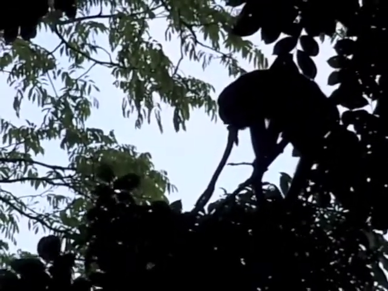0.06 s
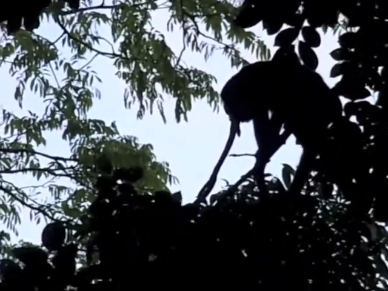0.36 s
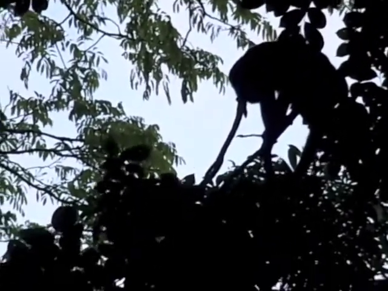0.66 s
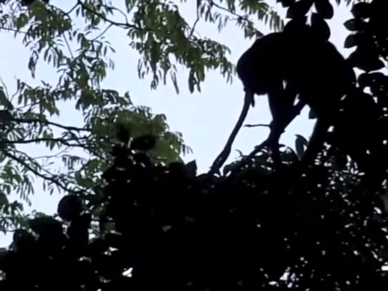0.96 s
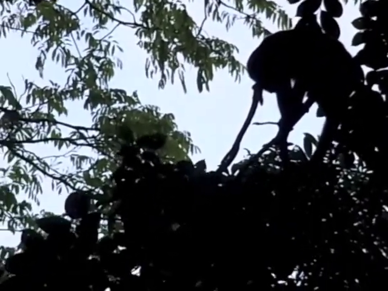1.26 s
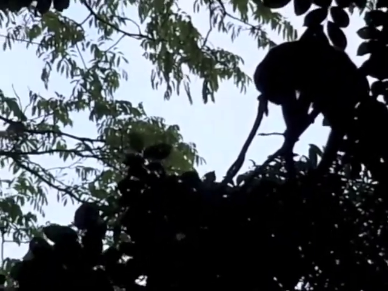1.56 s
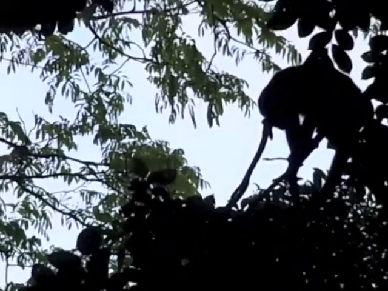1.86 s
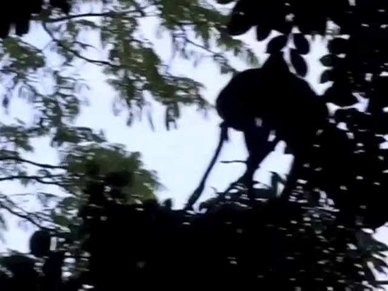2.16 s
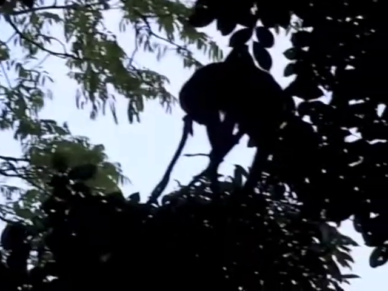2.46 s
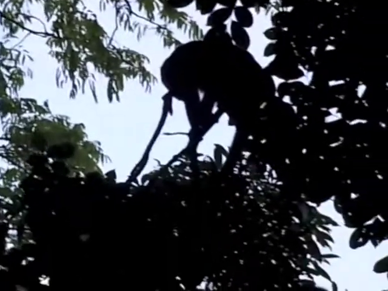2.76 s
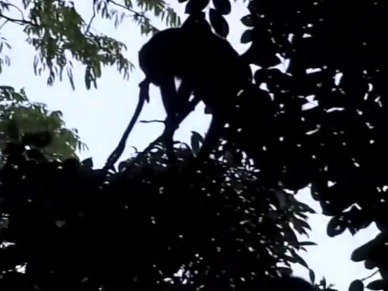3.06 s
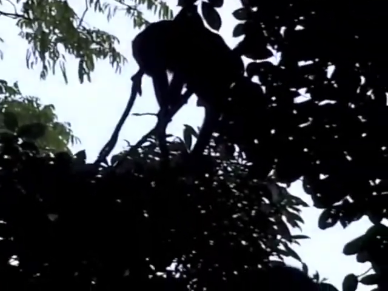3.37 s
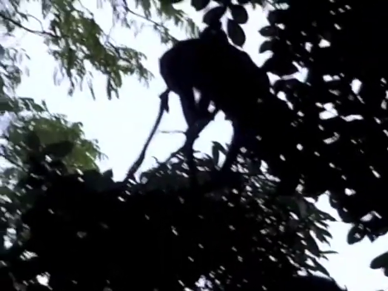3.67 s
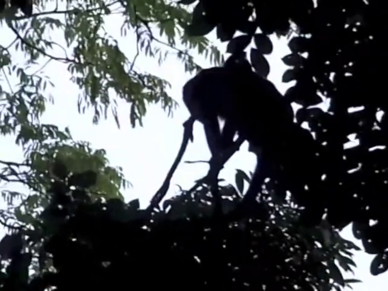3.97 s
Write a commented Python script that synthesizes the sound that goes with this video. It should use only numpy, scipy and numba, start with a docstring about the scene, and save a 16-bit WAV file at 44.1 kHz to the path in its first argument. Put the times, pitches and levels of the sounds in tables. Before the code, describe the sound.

Hoarse grunting barks from a monkey repeat steadily over a faint outdoor hush.

```python
"""In a forest, a howler monkey up in a treetop gives four hoarse barks, about two a second: irregular
flaps of its vocal folds and rushing air ring the throat sac and mouth, and the trees echo each bark.
It draws a rasping grunt inward just as a bird chirps once, far off. Four more barks and a second
inward grunt follow. Throughout, a distant hush and faint insects lie behind the monkey, and the
camera whines thinly at the microphone."""
import sys
import numpy as np
from scipy import signal
from scipy.fft import rfft, irfft
from scipy.io import wavfile
from numba import njit

SR = 44100
rng = np.random.default_rng(int(sys.argv[2]) if len(sys.argv) > 2 else 0)


def log_audio(samples):
    """Write samples as a 16-bit WAV file to the path given in sys.argv[1]."""
    # one column per channel
    frames = np.atleast_2d(samples).T
    # limit to full scale, then quantise
    limited = np.clip(frames, -1, 1)
    pcm = np.round(limited * 32767).astype(np.int16)
    wavfile.write(sys.argv[1], SR, pcm)


N = 176400

# The barks, levels relative: start_s, end_s, level_db, sac_db, mouth_db's tone mouth_hz, mouth_db,
# mouth_surge_s, nasal_db, rasp_ring_hz, rasp_db, rasp_surge_s, lower_ring_db
BARKS = [(0.000, 0.163, 0, 2, 656, -0.5, 0.075, 0.5, 3360, 3, 0.13, -2),
         (0.487, 0.64, -.5, 4, 660, -1, 0.11, -3, 3380, 0.5, 0.093, -1.5),
         (0.948, 1.114, -1, 2.5, 660, -1, 0.072, -0.5, 3273, 1.5, 0.099, -2),
         (1.527, 1.675, -4, 4, 665, 6, 0.086, 4, 3330, 4.5, 0.091, -4.5),
         (2.135, 2.262, -.5, 0.5, 732, 0.5, 0.14, 6.5, 3340, 2.5, .09, -1),
         (2.514, 2.663, 1.5, 2, 677, -2, 0.112, -10, 3192, -1, 0.058, 0),
         (2.994, 3.129, 1.5, 1, 689, -2, 0.099, -9, 3210, -1.5, 0.095, 4),
         (3.481, 3.627, -1, 1.5, 728, -0.5, 0.13, -7, 3186, 3, 0.22, 3)]
# Inward grunts: start_s, length_s, gain_db
INWARD_GRUNTS = [(1.852, 0.093, -6), (3.889, .125, -4.5)]
# Broad throat resonances of a bark: centre_hz, width_hz, gain_db
THROAT_MODES = [(276.8, 38, -14), (375, 59, -2), (501.4, 76, -4), (629, 57, -5.5), (733, 120, -10),
                (1010, 63, -23), (1214.5, 37, -11.5)]
# Upper resonances that the rasp excites: centre_hz, width_hz, gain_db
RASP_MODES = [(3240, 280, -16.5), (4838, 78, -19.5), (4960, 580, -13.5), (5950, 500, -31.5),
              (7060, 200, -23.5), (7540, 400, -23.5), (3700, 7900, -23.5)]
# Resonances of an inward grunt: centre_hz, width_hz, gain_db
GRUNT_MODES = [(326, 110, -4.5), (391, 105, 2.5), (502, 170, -10), (710, 46, 0), (1220, 710, -36),
               (2880, 90, -21), (6000, 360, -23), (4570, 1900, -28)]
# Echoes off nearby trunks: delay_s, gain_db
TRUNK_ECHOES = [(0.044, -24), (.11, -15), (0.158, -26.5)]
# Bands that linger among the trees: centre_hz, width_hz, gain_db, t60_s
LINGERING_BANDS = [(329, 34, -5.5, 1.14), (675, 82, -6, 1.01)]
# Steady shrills of far insects: pitch_hz, width_hz, level_db
INSECT_SHRILLS = [(4966, 210, -64), (6976, 450, -66)]
# Swells of high insect fizz: peak_s, half_length_s, level_db
FIZZ_SWELLS = [(0.038, 0.06, -61), (0.637, 0.12, -62), (1.34, .09, -61), (3.44, 0.12, -66)]
# Spectrum of the distant hush: frequency_hz, relative_density_db
HUSH_SPECTRUM = [(25, -14), (55, -19), (110, -8.5), (180, -10), (320, 8.5), (480, 2.5), (750, 6),
                 (1000, 1.5), (1900, -2), (3000, -8), (5000, -11.5), (8500, -19), (11500, -18.5),
                 (15000, -21)]

BARK_FLAP_HZ, GRUNT_FLAP_HZ = 88, 115
JITTER, SHIMMER_DB, AIR_SHARE = .25, 2.4, .8
SAC_HZ, NASAL_HZ, CHEST_HZ, LOWER_RING_HZ = 314, 1900, 155, 2860
MOUTH_SURGE_DB, MOUTH_LEAD_S, RASP_SURGE_DB = 8, .012, 4
VOICE_GAIN_DB, HUSH_DB = -32.5, -44.5
WHINE_HZ, FRAME_HZ, WHINE_DB = 12275.5, 29.97, -66
LOW_CUT_HZ, TOP_HZ = 130, 15050


def barks():
    """Flaps ring the throat, sac and mouth while air drives the rasp; mouth and rasp each surge once."""
    out, t = np.zeros(N), np.arange(SR // 2) / SR
    for (start, end, level_db, sac_db, mouth_hz, mouth_db, mouth_surge_s, nasal_db,
         rasp_ring_hz, rasp_db, rasp_surge_s, lower_ring_db) in BARKS:
        length = end - start
        progress = np.minimum(t / length, 1)
        flaps, air = vocal_folds(t, BARK_FLAP_HZ)
        push = effort(t, length, swell_s=.08, onset_db=-5, release_s=.014)
        growl = flaps * push
        breath = air * effort(t, length, swell_s=.06, onset_db=-4, release_s=.016)
        breath *= undb(RASP_SURGE_DB * (swell(t, rasp_surge_s, .028) - 1.5))
        mouth_surge = undb(MOUTH_SURGE_DB * (swell(t, mouth_surge_s - MOUTH_LEAD_S, .018) - .5))
        sac_rise = 1 - .09 * np.exp(-t / .04)  # the pitch climbs as the sac fills
        rasp_fall = 1 - .03 * (progress - .6)
        voice = sum(undb(db) * resonate(growl, hz * (1 + .015 * rng.standard_normal()), width)
                    for hz, width, db in THROAT_MODES)
        voice += undb(sac_db) * resonate(growl * push, SAC_HZ * sac_rise, 32)
        voice += undb(mouth_db) * resonate(growl * mouth_surge, mouth_hz, 42)
        voice += undb(nasal_db - 11) * resonate(breath * progress, NASAL_HZ * sac_rise ** .16, 45)
        voice += undb(-26) * resonate(growl, CHEST_HZ, 45)
        rasp = sum(undb(db) * resonate(breath, hz * rasp_fall, width) for hz, width, db in RASP_MODES)
        rasp += undb(-15) * resonate(breath, rasp_ring_hz * rasp_fall, 60)
        rasp += undb(lower_ring_db - 17) * resonate(breath, LOWER_RING_HZ, 97)
        add(out, start, undb(level_db) * (voice + undb(rasp_db) * rasp))
    return out


def inward_grunts():
    """Softer, duller grunts: the folds flap and ring the throat as the monkey draws air in."""
    out, t = np.zeros(N), np.arange(SR // 2) / SR
    for start, length, gain_db in INWARD_GRUNTS:
        flaps, _ = vocal_folds(t, GRUNT_FLAP_HZ)
        growl = flaps * effort(t, length, swell_s=.06, onset_db=-9, release_s=.11)
        grunt = sum(undb(db) * resonate(growl, hz, width) for hz, width, db in GRUNT_MODES)
        add(out, start, undb(gain_db) * grunt)
    return out


def vocal_folds(t, flap_hz):
    """Irregular flaps, each followed by a puff of air; gives a flap-heavy mix and an airy one."""
    chance = rng.standard_normal((128, 2))
    periods = np.exp(JITTER * chance[:, 0]) / flap_hz
    onsets = ((np.cumsum(periods) - periods) * SR).astype(int)
    inside = onsets < len(t)
    flaps = np.zeros(len(t))
    flaps[onsets[inside]] = undb(SHIMMER_DB * chance[inside, 1])
    airflow = signal.lfilter([1], [1, -np.exp(-1 / (.015 * SR))], flaps)
    puffs = unit(airflow * rng.standard_normal(len(t)))
    return unit(unit(flaps) + AIR_SHARE * puffs), unit(puffs + .17 * unit(flaps))


def effort(t, length, swell_s, onset_db, release_s):
    """The push of one breath: quick attack, swell to full strength, hold, release."""
    attack = np.clip(t / .02, 0, 1)
    build = undb(onset_db * np.clip(1 - t / swell_s, 0, 1))
    release = np.exp(-np.maximum(t - length, 0) / release_s)
    return attack * build * release


def forest(calls):
    """Trunks and leaves scatter the calls into a tail with a few echoes; deep tones linger longest."""
    t = np.arange(SR) / SR

    def tail(t60_s):
        return unit(np.minimum(t / .02, 1) * undb(-60 * t / t60_s))

    noise = rng.standard_normal((3, SR))
    low = signal.sosfilt(signal.butter(2, 1100, fs=SR, output="sos"), noise[0])
    high = signal.sosfilt(signal.butter(2, 1500, "high", fs=SR, output="sos"), noise[1])
    response = undb(-10) * low * tail(t60_s=.7) + undb(-5) * high * tail(t60_s=.63)
    response += sum(undb(db) * unit(noise[2] * swell(t, delay, .0021)) for delay, db in TRUNK_ECHOES)
    for hz, width, db, t60_s in LINGERING_BANDS:
        band = moving_bandpass(rng.standard_normal(SR), np.full(SR, float(hz)), float(width))
        response += undb(db) * band * tail(t60_s)
    return calls + signal.fftconvolve(calls, response / np.sqrt(SR))[:N]


def bird():
    """One short chirp, far from the microphone."""
    t = np.arange(N) / SR
    return undb(-58) * swell(t, 1.885, .025) * noise_band(hz=3600, width_hz=70)


def insects():
    """Two faint steady shrills in the distance, and a high fizz that comes and goes."""
    t = np.arange(N) / SR
    fizz_level = sum(undb(db) * swell(t, peak, half_length) for peak, half_length, db in FIZZ_SWELLS)
    fizz = fizz_level * noise_band(hz=11000, width_hz=2600)
    return fizz + sum(undb(db) * noise_band(hz, width) for hz, width, db in INSECT_SHRILLS)


def hush():
    """The bed of the place: smooth, distant outdoor noise."""
    hz, db = np.array(HUSH_SPECTRUM).T
    bin_hz = np.maximum(np.arange(N // 2 + 1) * SR / N, 1)
    colour = undb(np.interp(np.log(bin_hz), np.log(hz), db))
    return undb(HUSH_DB) * unit(irfft(rfft(rng.standard_normal(N)) * colour, N))


def camera_whine():
    """The camera's thin electronic whine restarts with every picture and so flutters finely."""
    t = np.arange(N) / SR
    return np.sqrt(2) * undb(WHINE_DB) * np.sin(2 * np.pi * WHINE_HZ * (t % (1 / FRAME_HZ)))


def noise_band(hz, width_hz):
    """A band of noise with rms near 1."""
    return resonate(rng.standard_normal(N), hz, width_hz)


def resonate(drive, hz, width_hz):
    """A steep resonance that keeps the energy of what drives it."""
    centre_hz = hz * np.ones(len(drive))
    ring = moving_bandpass(drive, centre_hz, float(width_hz))
    return unit(moving_bandpass(ring, centre_hz, 2. * width_hz)) * np.std(drive)


@njit
def moving_bandpass(x, hz, width_hz):
    """State-variable band-pass whose centre can glide."""
    out, band_state, low_state = np.empty(len(x)), 0., 0.
    for i in range(len(x)):
        tuning, damping = np.tan(np.pi * hz[i] / SR), width_hz / hz[i]
        band = (band_state + tuning * (x[i] - low_state)) / (1 + tuning * (tuning + damping))
        band_state = 2 * band - band_state
        low_state += 2 * tuning * band
        out[i] = damping * band
    return out


def swell(t, peak_s, half_length_s):
    """A bell-shaped rise and fall."""
    return np.exp(-.5 * ((t - peak_s) / half_length_s) ** 2)


def add(out, start_s, sound):
    """Mix a sound in at its time."""
    i = max(int(start_s * SR), 0)
    out[i:i + len(sound)] += sound[:N - i]


def undb(db):
    """Decibels to gain."""
    return 10 ** (np.asarray(db) / 20)


def unit(x):
    """Scale to rms 1."""
    return x / np.sqrt(np.mean(x ** 2))


def scene():
    """One microphone in the forest: monkey and bird through the trees, over hush, insects and whine."""
    low_cut = signal.butter(4, LOW_CUT_HZ, "high", fs=SR, output="sos")
    monkey = undb(VOICE_GAIN_DB) * signal.sosfilt(low_cut, barks() + inward_grunts())
    return (forest(monkey + bird()) + hush() + insects() + camera_whine())[None]


def record(dry):
    """The recorder cuts the highest treble steeply."""
    return signal.sosfilt(signal.ellip(10, .2, 80, TOP_HZ, fs=SR, output="sos"), dry)


dry = scene()
out = record(dry)
log_audio(out)
```